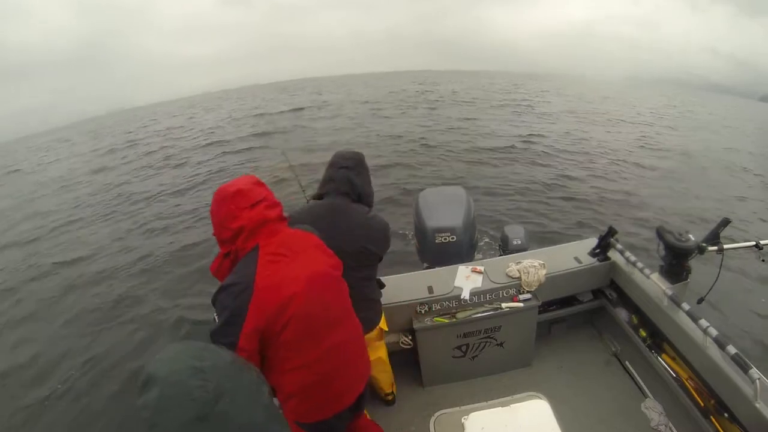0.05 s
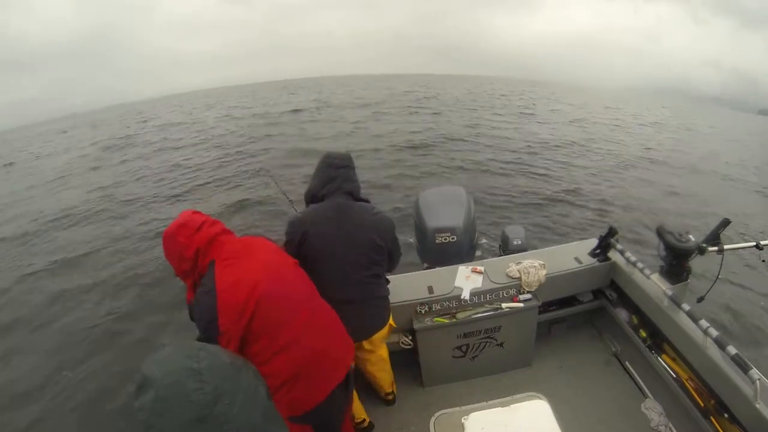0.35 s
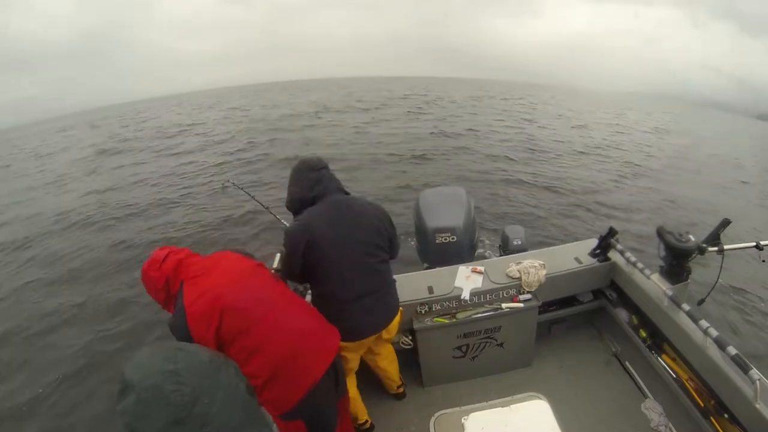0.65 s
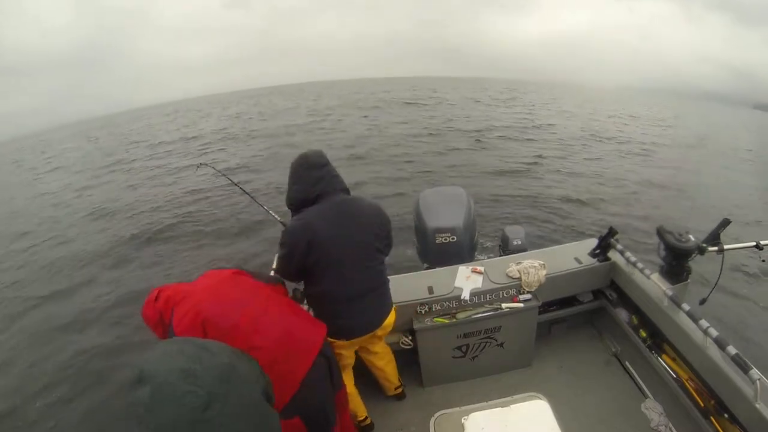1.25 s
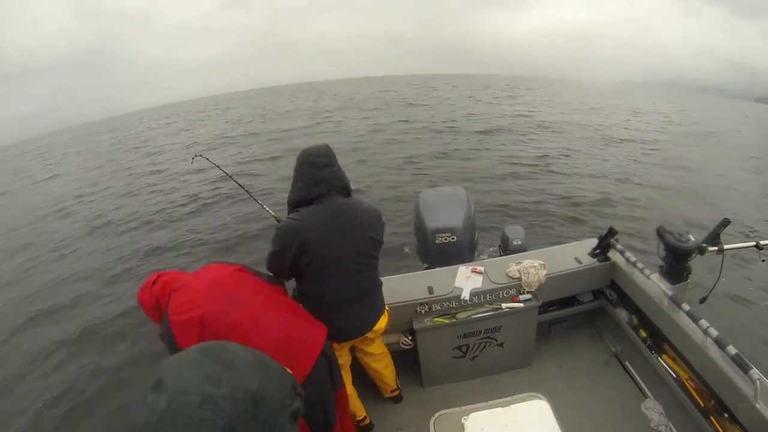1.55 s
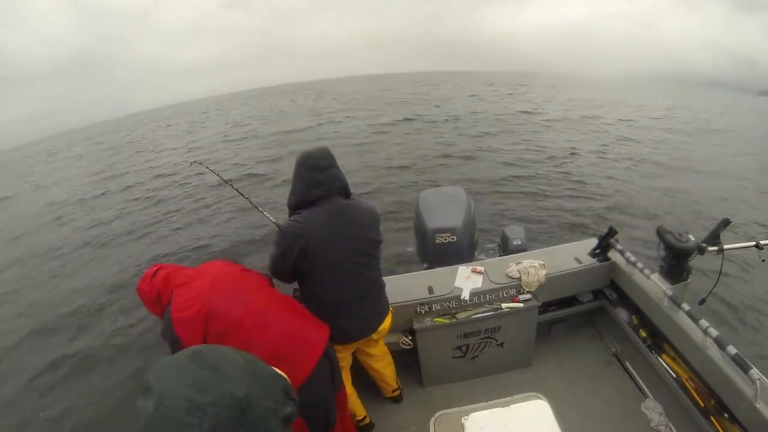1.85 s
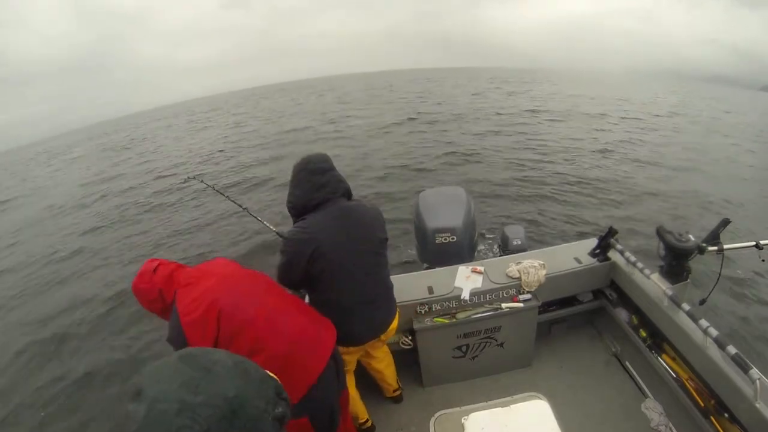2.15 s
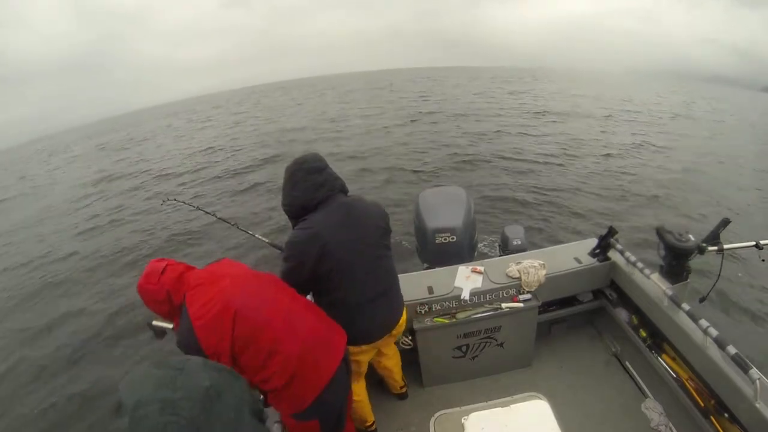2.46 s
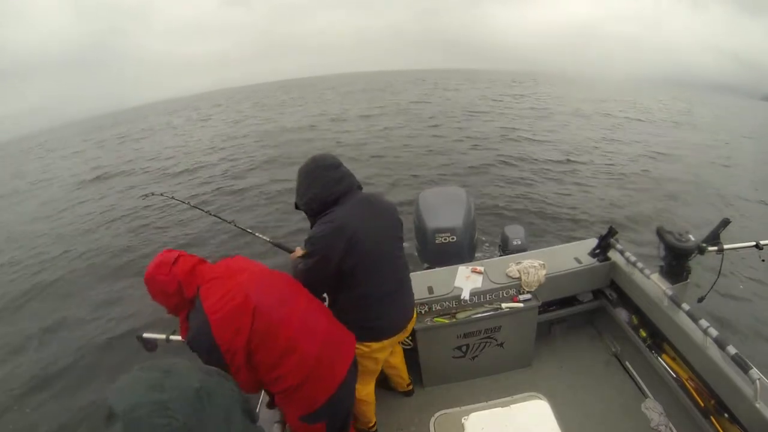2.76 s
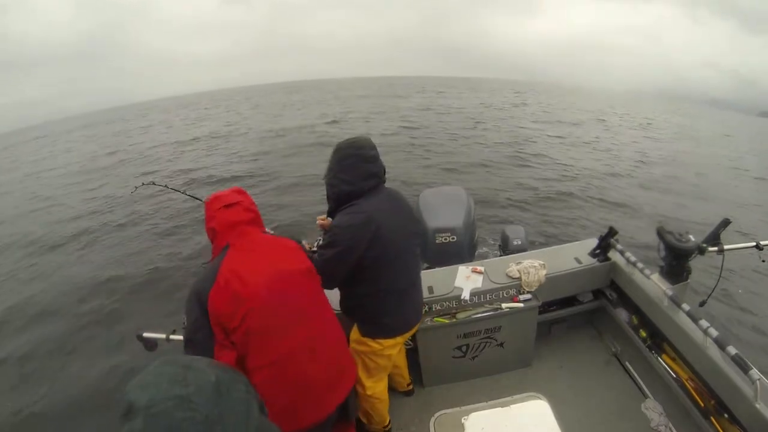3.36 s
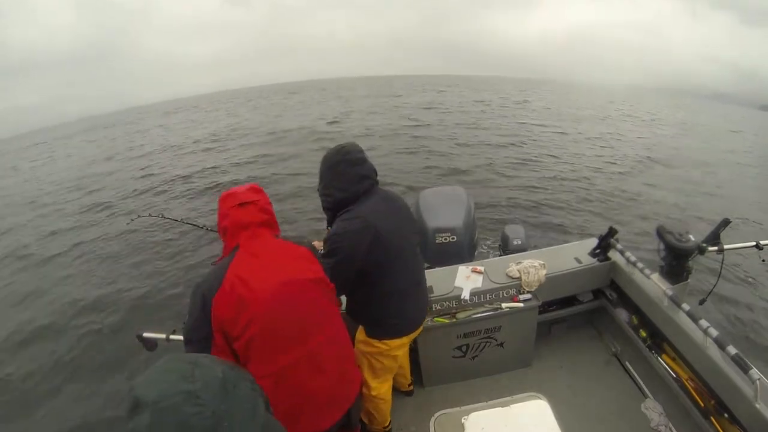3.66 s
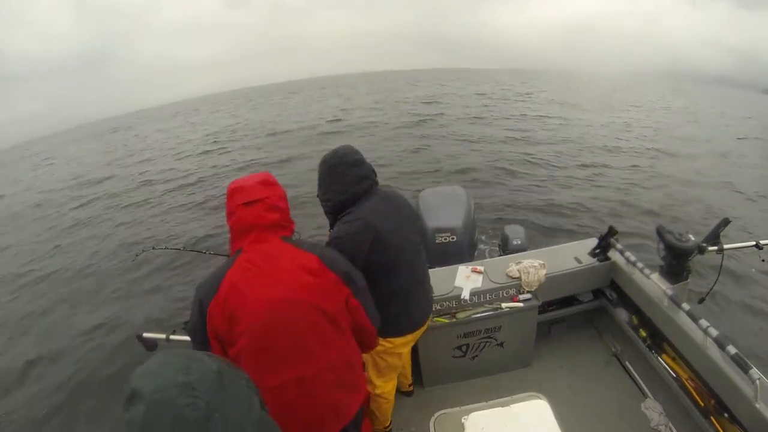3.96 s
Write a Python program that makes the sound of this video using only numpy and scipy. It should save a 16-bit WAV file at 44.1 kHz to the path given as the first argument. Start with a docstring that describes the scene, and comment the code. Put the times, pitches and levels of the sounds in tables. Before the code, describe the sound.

Low, swelling wind rumble at sea, with soft wave thuds and two knocks of fishing gear.

```python
"""Small boat adrift

On deck in a light swell, one microphone in a housed camera fixed above the boards.
Wind and hull vibration keep the mount swinging at one deep note; water laps and thuds on the hull.
Fishing gear knocks twice on the boat and clicks now and then, over a faint hiss and electronic whine."""
import sys
import numpy as np
from scipy import signal
from scipy.fft import rfft, irfft
from scipy.io import wavfile
from scipy.ndimage import uniform_filter1d

SR = 44100
rng = np.random.default_rng(int(sys.argv[2]) if len(sys.argv) > 2 else 0)


def output_pcm(signal):
    """Save a mono or channel-first signal as 16-bit PCM at the path in sys.argv[1].

    Samples are clipped to [-1, 1] before scaling.
    """
    pcm = np.clip(np.atleast_2d(signal).T, -1, 1) * 32767
    wavfile.write(sys.argv[1], SR, np.round(pcm).astype(np.int16))


N = 176400


def undb(db):
    """Decibels to gain."""
    return 10 ** (np.asarray(db) / 20)


def unit(x):
    """Scale to rms 1."""
    return x / np.sqrt(np.mean(x ** 2))


def clock():
    """Time of every sample."""
    return np.arange(N) / SR


def curve(rows):
    """Join (s, value) rows by straight lines."""
    return np.interp(clock(), *np.array(rows).T)


def colour(x, points):
    """Filter by a spectrum of (Hz, dB) points."""
    hz, db = np.array(points, float).T
    f = np.maximum(np.fft.rfftfreq(N, 1 / SR), 1)
    return irfft(rfft(x) * undb(np.interp(np.log(f), np.log(hz), db)), N)


def band(hz, width_hz):
    """Noise in a narrow band, rms 1."""
    f = np.fft.rfftfreq(N, 1 / SR)
    return unit(irfft(rfft(rng.standard_normal(N)) / (1 + ((f - hz) / width_hz) ** 2), N))


def walk(rate):
    """Smooth random drift, rms 1, at about `rate` steps a second."""
    k = int(SR / rate)
    steps = rng.standard_normal(N)[np.arange(N) // k]
    return unit(uniform_filter1d(uniform_filter1d(steps, k), k))


def fade(age, t60):
    """Exponential decay from age 0 on."""
    return np.exp(-np.log(1000) * np.maximum(age, 0) / t60) * (age >= 0)


def ring(modes, age):
    """Decaying (Hz, dB, t60 s) modes of alternating sign."""
    return sum((-1) ** k * undb(db) * fade(age, t60) * np.sin(2 * np.pi * hz * age)
               for k, (hz, db, t60) in enumerate(modes))


# Strength of the vibration at the camera mount: t/s, relative level/dB
MOUNT_SHAKE = [(0.04, -15), (0.21, -22), (0.48, -18), (0.53, -22), (0.73, -12.5), (1.16, -14),
               (1.24, -19.5), (1.4, -20.5), (1.43, -17), (1.74, -11.5), (1.9, -17), (2.02, -29),
               (2.05, -22), (2.38, -9), (2.73, -18), (2.78, -24.5), (2.85, -24.5), (2.91, -26),
               (3.16, -9.5), (3.32, -8), (3.67, -10.5), (3.79, -16), (3.89, -34.5), (3.97, -20.5)]

def mount(note_hz=34.3, hz_per_db=0.1):
    """Right at the microphone: the mount swings, a little higher when harder, with wind buffeting it."""
    shake_db = curve(MOUNT_SHAKE)
    hz = note_hz * (1 + 0.003 * walk(2.8)) + hz_per_db * (shake_db - np.percentile(shake_db, 75))
    phase = 2 * np.pi * np.cumsum(hz) / SR
    swing = np.sin(phase) + undb(-42) * np.sin(2 * phase)
    buffet = undb(-34) * band(note_hz, width_hz=7) * np.sqrt(undb(shake_db - shake_db.mean()))
    sway = undb(-35) * band(17.5, width_hz=2)
    return undb(shake_db + 2.5) * swing + buffet + sway


# Spectrum of water along the hull: f/Hz, relative density/dB
WASH_SPECTRUM = [(25, -28), (45, -7), (60, 3), (80, -8.5), (100, -1), (128, -2), (148, -15), (200, -14.5),
                 (260, -34.5), (400, -42.5), (900, -81.5)]
# Its rise and fall: t/s, relative level/dB
WASH_LEVEL = [(0.14, -42.5), (0.2, -38.5), (0.53, -44), (1.3, -46), (1.93, -49), (1.96, -41.5),
              (2.18, -38.5), (2.45, -44), (2.62, -38), (2.9, -46.5), (3.43, -49.5), (3.47, -41.5),
              (3.94, -47.5)]

def wash():
    """Down at the waterline: water washes along the hull in low surges."""
    return unit(colour(rng.standard_normal(N), WASH_SPECTRUM)) * undb(curve(WASH_LEVEL) + 3.5)


# Spectrum of open sea and air: f/Hz, relative density/dB
SEA_SPECTRUM = [(150, 0), (300, -0.5), (450, -3.5), (800, -7.5), (1500, -10), (2100, -16), (3200, -13),
                (3800, -19.5), (6300, -26), (8800, -22), (11500, -32.5), (14500, -32)]

def sea_hiss():
    """All around the boat: a soft hiss of air and sea that rises a little with the mount's rumble."""
    shake_db = curve(MOUNT_SHAKE)
    level_db = -56 + 0.1448 * (shake_db - shake_db.mean())
    return unit(colour(rng.standard_normal(N), SEA_SPECTRUM)) * undb(level_db)


def whine(note_hz=5105, pulse_hz=60, blip_hz=5560, blip_every_s=0.25):
    """Faint electronics: each pulse of a thin buzz lands on its own pitch, and a higher blip cuts in."""
    t = clock()
    pulses = t * pulse_hz
    pulse_gate = uniform_filter1d(1. * (pulses % 1 < 0.8), size=90)
    blip_gate = uniform_filter1d(1. * ((t - 0.139) % blip_every_s < 0.017), size=90)
    wobble_hz = 45 * uniform_filter1d(rng.standard_normal(N)[pulses.astype(int)], size=300)
    jitter_hz = 130 * walk(3000)
    phase = 2 * np.pi * np.cumsum(note_hz + wobble_hz + jitter_hz) / SR
    buzz = undb(-69) * np.sqrt(2) * (np.sin(phase) + undb(-3) * np.sin(2 * phase))
    blip = undb(-70) * np.sin(2 * np.pi * blip_hz * t)
    fizz = undb(-77) * band(13070, width_hz=630)
    return buzz * pulse_gate * (1 - blip_gate) + blip * blip_gate + fizz


def plop(at=0.035, note_hz=730, sag_hz_per_s=12000):
    """Over the side: one soft plop of water, a short falling note."""
    age = clock() - at
    envelope = undb(-48) * np.exp(-(age / 0.009) ** 2)
    return envelope * np.sin(2 * np.pi * (note_hz - sag_hz_per_s * age / 2) * age)


# Modes of small hard tackle: f/Hz, relative level/dB, t60/s
TACKLE_MODES = [(1450, -3.5, 0.012), (1646, -6.5, 0.019), (1976, -2, 0.01), (2313, 2, 0.0051),
                (3140, -25, 0.008), (3670, -4, 0.017), (4140, 1.5, 0.006), (5010, -14, 0.013),
                (5640, -11, 0.014), (9150, -4, 0.00078)]
# Tackle clicks: t/s, gain/dB, the part's own f/Hz, contact gain/dB, ring gain/dB
TACKLE_CLICKS = [(0.165, -34.5, 1370, -50, -23), (0.232, -49, 1200, -40, -19), (0.633, -53, 1900, -40, -14),
                 (1.015, -38.5, 3580, 0, 5.5), (1.158, -47, 1400, -32, -13), (1.198, -48.5, 1720, -35, -14),
                 (1.8391, -20, 2620, -30, 2), (3.025, -45.5, 1340, -28, -13),
                 (3.167, -51.5, 2510, -38, -13), (3.5835, -36.5, 3100, -7.5, -3),
                 (3.588, -36.5, 1540, -35, -7), (3.606, -34, 2320, -12, -7)]

def tackle_clicks():
    """On deck: small hard parts tick with a sharp contact, a brief ring and scatter off the boards."""
    out, age = np.zeros(2 * N), clock()[:4096]
    for at, db, own_hz, contact_db, ring_db in TACKLE_CLICKS:
        # Modes far from the part's own note ring less.
        modes = [(hz, level - 2 * np.log2(hz / own_hz) ** 2, t60) for hz, level, t60 in TACKLE_MODES]
        ringing = ring(modes, age)
        note = ring([(own_hz, 10, 0.0044)], age) * (1 - np.exp(-age / 0.00012))
        contact = 2 * ring([(5900, contact_db, 0.0019)], age)
        tick = undb(ring_db) * ringing / np.abs(ringing).max() + note + contact
        deck = rng.standard_normal(len(age)) * fade(age, t60=0.038)
        scatter = signal.fftconvolve(tick, deck)[:len(age)] / np.sqrt(np.sum(tick ** 2))
        start = int(at * SR)
        out[start:start + len(age)] += undb(db) * (tick + undb(-31) * scatter)
    return signal.sosfilt(signal.butter(8, 1100, "high", fs=SR, output="sos"), out[:N])


# Soft laps of water: crest t/s, level/dB, half-width/s, centre f/Hz
WATER_LAPS = [(0.18, -52, 0.033, 630), (0.782, -56, 0.048, 700), (1.926, -55.5, 0.026, 480),
              (2.006, -58, 0.028, 1300), (2.14, -62, 0.043, 1370), (2.411, -64, 0.046, 1110),
              (3.547, -64, 0.19, 765)]

def laps(octaves=0.83, flutter_db=2.5):
    """Alongside: small laps of water, each a fluttering splash that swells and fades."""
    out = 0
    for at, db, half_width, hz in WATER_LAPS:
        spectrum = [(hz / 4 ** octaves, -20), (hz, 0), (hz * 2 ** octaves, -12), (12000, -65)]
        splash = colour(rng.standard_normal(N), spectrum) * undb(flutter_db * walk(70))
        envelope = np.exp(-((clock() - at) / half_width) ** 2)
        out += undb(db) * envelope * unit(splash)
    return out


# Waves meeting the hull: crest t/s, level/dB, rise time constant/s
WAVES = [(0.188, -25.5, 0.0087), (0.868, -32.5, 0.045), (1.0, -30, 0.032), (1.8, -43, 0.073),
         (3.07, -40, 0.053), (3.49, -29.5, 0.03), (3.841, -40, 0.05)]
# Hollow resonances of the hull: f/Hz, relative level/dB
HULL_MODES = [(173, 0), (192, -14), (214, -8), (259, -20), (388, -29)]
# Spectrum of churning water: f/Hz, relative density/dB
CHURN_SPECTRUM = [(60, -26.5), (130, -8), (200, -3), (280, -13.5), (400, -20.5), (900, -49)]

def wave_thuds(release_s=0.055, wander_hz=4.03, flutter_db=3.5):
    """Below the deck: each wave churns against the hollow hull and makes it boom."""
    t, boom = clock(), 0
    power = undb(-49.5) ** 2  # the hull murmurs on between waves
    for at, db, rise_s in WAVES:
        push = undb(db) * np.exp(np.where(t < at, (t - at) / rise_s, (at - t) / release_s))
        power += push ** 2
    for hz, db in HULL_MODES:
        gain = undb(db + flutter_db * walk(25.02))
        phase = 2 * np.pi * np.cumsum(hz + wander_hz * walk(40)) / SR
        boom += gain * np.sin(phase)
    churn = undb(-16) * unit(colour(rng.standard_normal(N), CHURN_SPECTRUM))
    return np.sqrt(power) * (unit(boom) + churn)


# Modes of the struck boat: f/Hz, relative level/dB, t60/s
BOAT_MODES = [(172, 0, .2), (212, 0, .12), (262, -6, .12), (325, -8, .1), (388, -3, .19), (544, -13, .15),
              (706, -11, .2), (928, 3, .13), (1028, -6, .17), (1114, -9, .19), (1262, 0, .13),
              (1370, -4, .12), (1450, -4, .12), (1705, -2, .12), (1900, -3, .11), (2375, -7, .09),
              (2520, -11, .09), (2880, -14, .1)]
# Spectrum of a knock's dense rattle: f/Hz, relative density/dB
RATTLE_SPECTRUM = [(100, -44), (180, -3.5), (270, 0), (480, -15.5), (900, -8), (1300, -6), (1850, -0.5),
                   (2130, -11.5), (2500, -8), (2950, -15.5), (3500, -28.5), (5200, -35.5), (8000, -53),
                   (15000, -58)]
# Gear landing and settling: t/s, gain/dB, thud/dB, 2 kHz band/dB, treble/dB, own f/Hz, own note/dB
GEAR_KNOCKS = [(1.432, -18, 3.5, -4, -3.5, 1866, -9), (2.5606, -23, -2, -12.5, 2.5, 1285, -3),
               (2.592, -36.5, 10, -20, -3, 391, 1.5)]

def gear_knocks(attack_s=0.0043, hold_s=0.008, drop_s=0.0034):
    """On board: gear lands with a dense rattle and a brief note of its own, leaving the boat ringing."""
    out = 0
    for at, db, thud_db, mid_db, treble_db, own_hz, own_db in GEAR_KNOCKS:
        age = clock() - at
        rise = np.clip((age + 0.00075) / attack_s, 0, 1)
        decay_age = np.maximum(age - attack_s - hold_s, 0)
        rattle = unit(colour(rng.standard_normal(N), RATTLE_SPECTRUM))
        crack = undb(-9.5) * rattle * np.exp(-decay_age / drop_s)
        lows = colour(rattle, [(1900, 13), (3200, -38)])
        tail = lows * fade(decay_age, t60=0.15) + (rattle - lows) * fade(decay_age, t60=0.14)
        note = ring([(own_hz, own_db, 0.073)], age - attack_s)
        blow = rise * (crack + undb(-10) * tail + undb(-12) * ring(BOAT_MODES, age) + note)
        timbre = [(280, thud_db), (400, 0.017), (1350, 0.02),
                  (1650, mid_db), (2300, mid_db), (3200, treble_db)]
        out += undb(db) * colour(blow, timbre)
    return out


# Faint thin tones: start t/s, end t/s, f/Hz, level/dB
THIN_TONES = [(1.85, 3.4, 1195, -66.5), (3.25, 4.2, 1340, -71)]

def thin_tones(ramp_s=0.047):
    """In the background: faint thin tones waver, come and go."""
    t, out = clock(), 0
    for start, end, hz, db in THIN_TONES:
        gate = np.clip(np.minimum(t - start, end - t) / ramp_s, 0, 1)
        gain = undb(db + 2 * walk(11))
        phase = 2 * np.pi * np.cumsum(hz * (1 + 0.002 * walk(40))) / SR
        out += gain * gate * np.sin(phase)
    return out


def scene():
    """Everything as it reaches the one microphone above the deck."""
    boat = mount() + wash() + wave_thuds() + gear_knocks() + tackle_clicks()
    background = whine() + thin_tones() + sea_hiss() + laps() + plop()
    return (boat + background)[None]


def record(dry):
    """The camera cuts the treble above 15.1 kHz."""
    return signal.sosfilt(signal.ellip(8, 0.2, 70, 15100, fs=SR, output="sos"), dry)


dry = scene()
out = record(dry)
output_pcm(out)
```